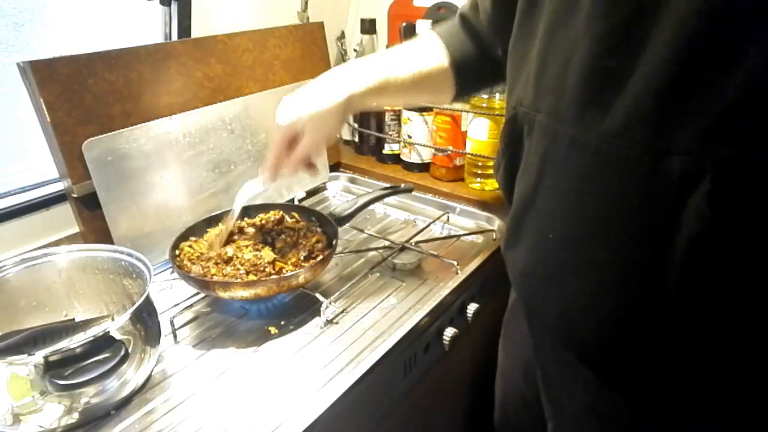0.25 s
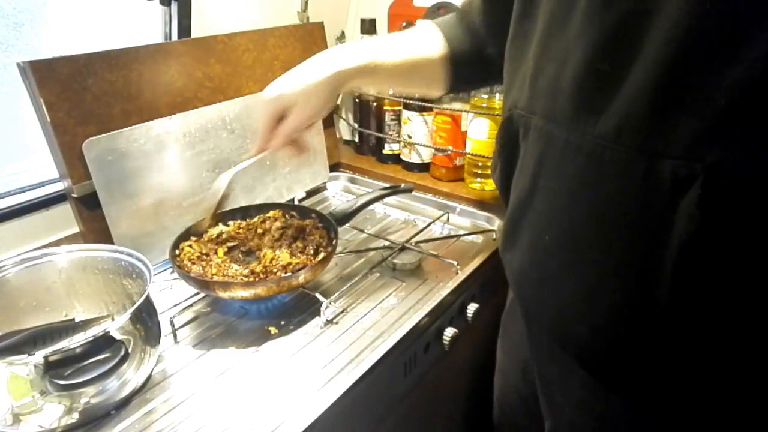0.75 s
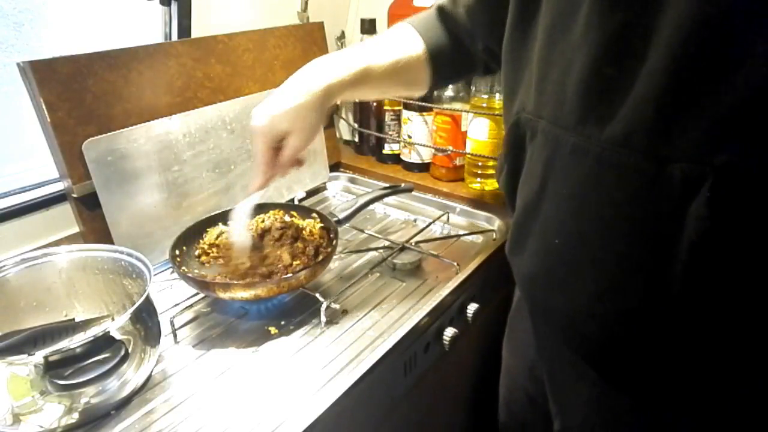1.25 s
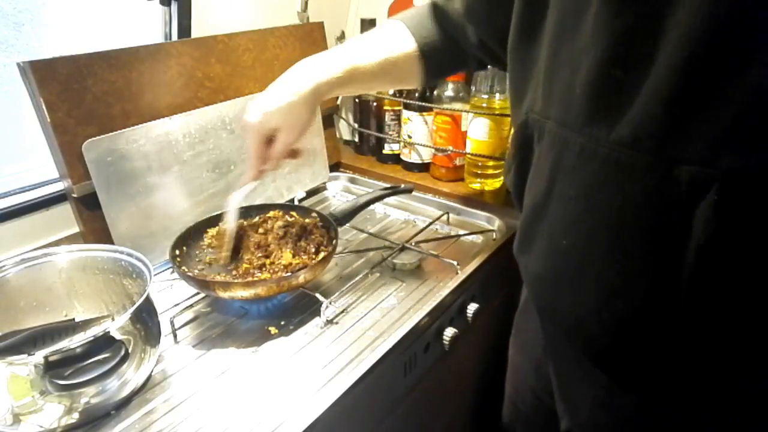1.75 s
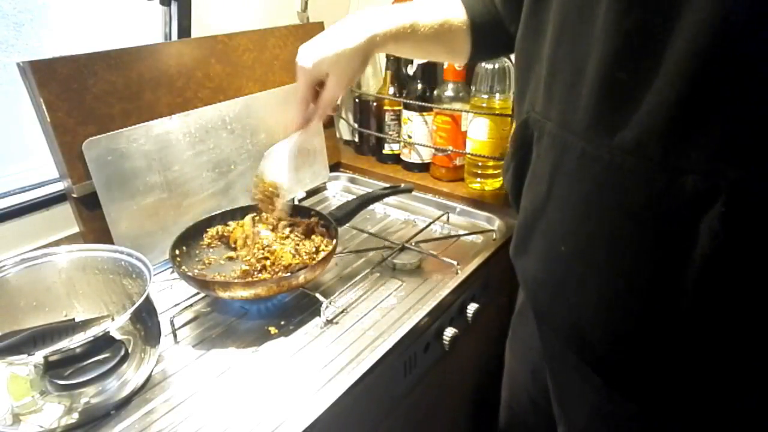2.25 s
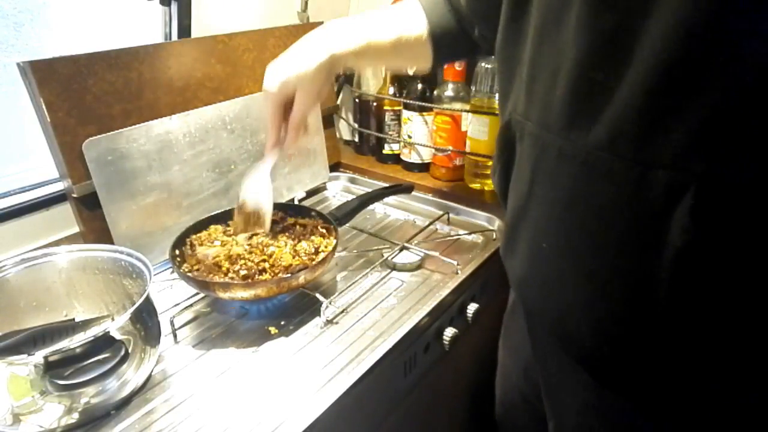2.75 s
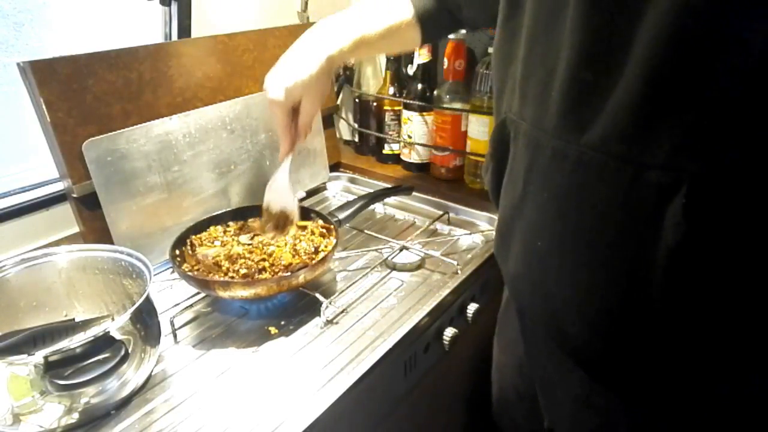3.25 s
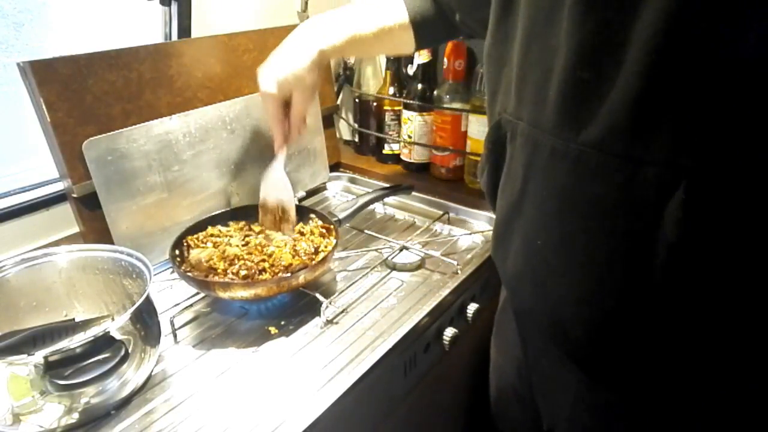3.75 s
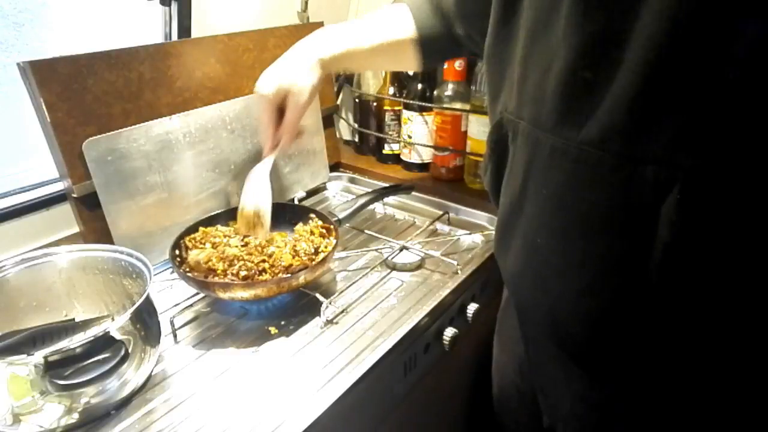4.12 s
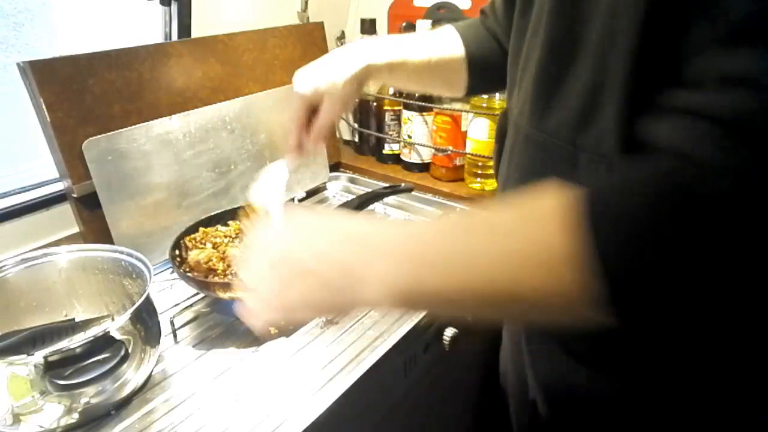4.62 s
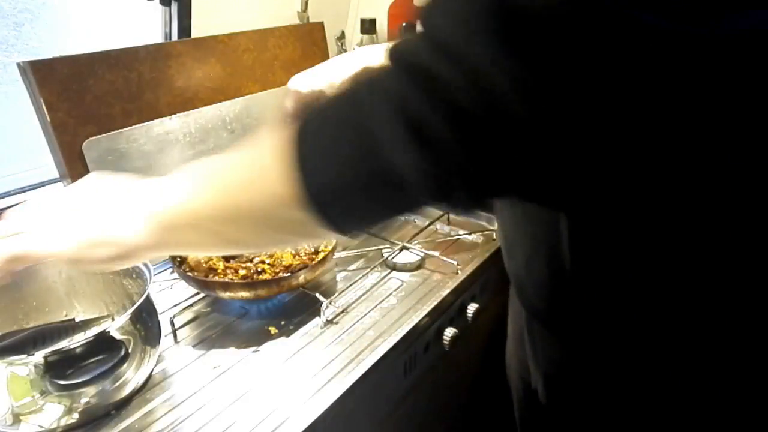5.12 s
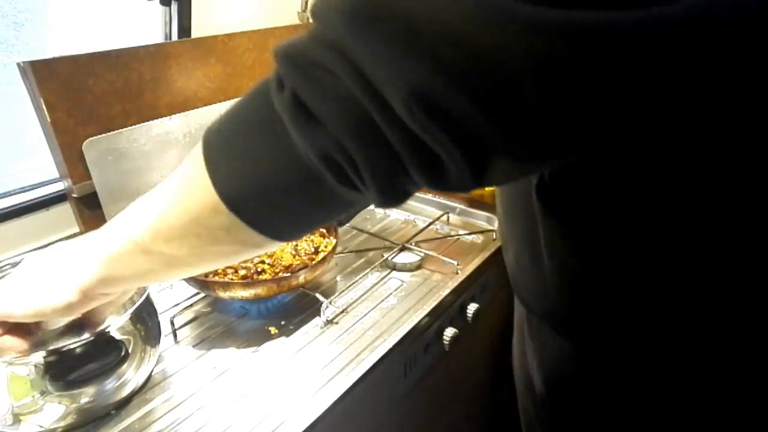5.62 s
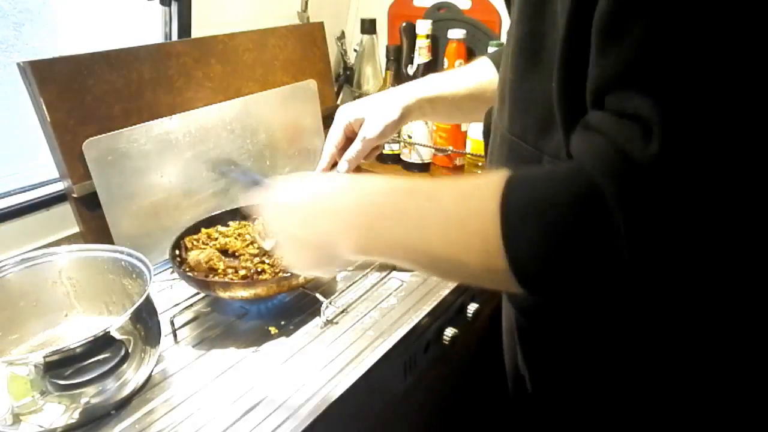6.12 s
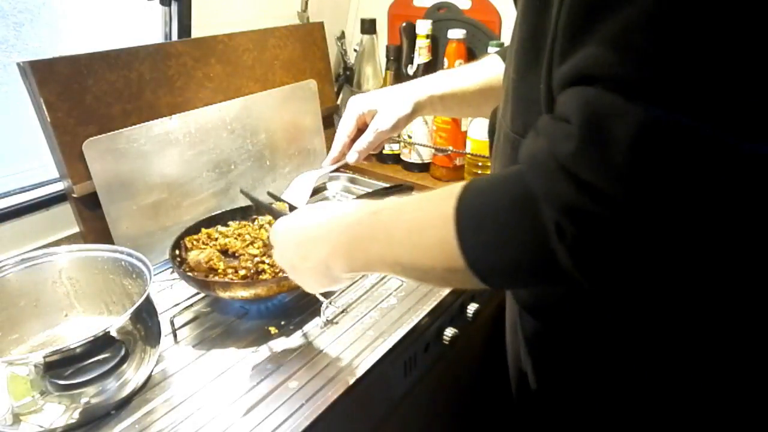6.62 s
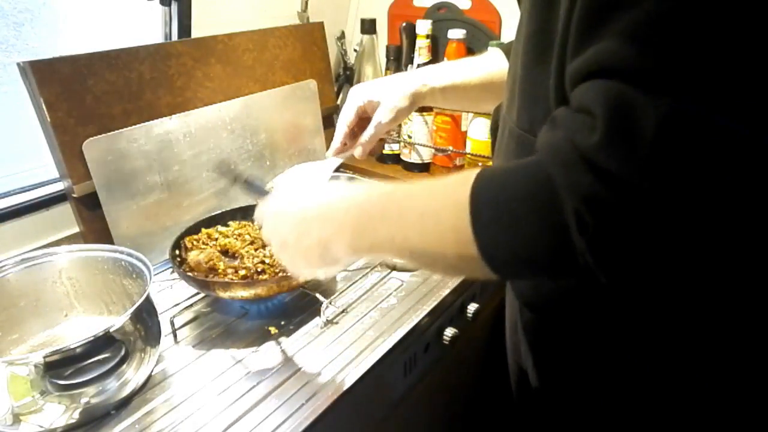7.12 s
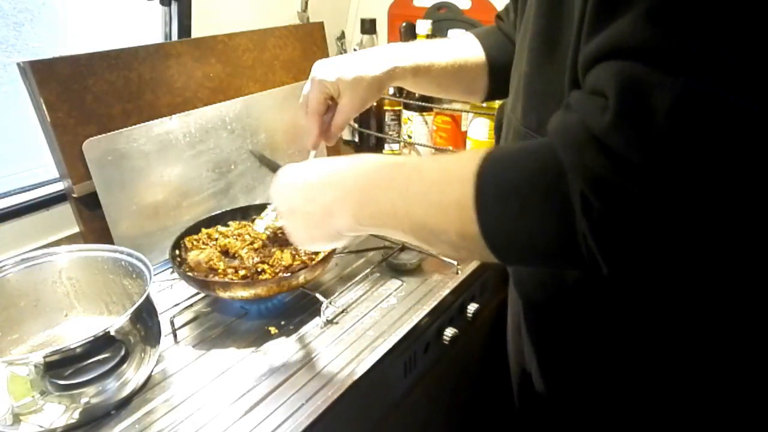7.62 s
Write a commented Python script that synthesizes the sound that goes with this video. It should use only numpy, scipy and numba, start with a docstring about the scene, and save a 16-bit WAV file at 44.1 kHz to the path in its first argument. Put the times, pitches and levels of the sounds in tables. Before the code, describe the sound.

A close, nearly dry kitchen perspective with a very faint low gas flutter beneath frying rice. At 0.3 s a short scrape and light knock make the quiet sizzle flare; thin steam follows. From 1.0 to 1.8 s the spatula works hard: gritty metallic scraping, a rapid cluster of dull wooden knocks with low hob thuds, a sharp oil pop at 1.2, and brighter hissing. A softer stroke comes at 2.1, then scraping and two knocks around 2.5-2.7. Between 3.2 and 4.1 s strokes crowd together, crackling and grating strongly at 3.4, with the loudest sharp knock near 3.97. Scrapes at 4.4 and 4.8 are lighter, the latter with a knock and sizzle flare. Steam whistles thinly at 5.3; steel pot clanks cluster at 5.55-5.7. Until about 8 s only low sizzle, faint scrapes, small taps and dry oil pops remain.

```python
"""A gas flame murmurs (filtered noise) under frying rice (noise bursts) in a pan in a small kitchen.
A wooden spatula stirs: rice crackles and flares into a sizzle, the blade chatters and grates (slips ring
metal modes) and knocks the pan and hob (struck modes). Steam hisses in narrow bands, oil spits as short
pops, and shoves judder the pan on its support. Later the other hand lifts a utensil out of a steel pot,
whose modes clank, and the stirring turns light."""
import sys
import numpy as np
from scipy import signal
from scipy.fft import rfft, irfft, next_fast_len
from scipy.io import wavfile
from scipy.ndimage import uniform_filter1d
from numba import njit

SR = 44100
rng = np.random.default_rng(int(sys.argv[2]) if len(sys.argv) > 2 else 0)


def waveform_to_disk(signal):
    """Save audio, clipped to [-1, 1], as 16-bit WAV at the path in sys.argv[1]."""
    frames = np.transpose(np.atleast_2d(signal))
    scaled = np.clip(frames, -1, 1) * 32767
    samples = np.round(scaled).astype(np.int16)
    wavfile.write(sys.argv[1], SR, samples)


N = 347067
TIME = np.arange(N) / SR
RING = np.arange(SR // 2) / SR  # half a second for each single sound

# Gas flame spectrum. Each row: frequency in Hz, relative gain in dB.
FLAME_SPECTRUM = [(15, -1), (28, -1), (45, -10), (76, -4), (110, -19), (165, -13.5), (250, -29.5),
                  (450, -36.5), (750, -23), (1100, -28), (3000, -51)]
FLAME_DB = -63

# Changing level of the frying, on which the strokes' flares ride. Each row: time in seconds,
# relative hiss level in dB, relative level of the fine treble spray in dB.
FRYING_LEVELS = [(0.0, -62.5, -68.5), (0.94, -58, -65.5), (1.25, -43, -49), (1.58, -48, -53.5),
                 (1.84, -41, -48.5), (2.17, -52, -54), (2.8, -45, -52), (3.37, -42.5, -48.5),
                 (3.57, -45.5, -56.5), (3.99, -44, -56), (4.14, -45, -57.5), (4.6, -50, -67.5),
                 (4.97, -58, -70.5), (5.52, -59.5, -67.5), (6.73, -57, -65), (7.87, -61, -71)]
# Hiss and spray spectra. Each row: frequency in Hz, relative gain in dB.
SIZZLE_SPECTRUM = [(1500, -46), (3000, -2.5), (4200, -5), (6300, 4), (8000, 5), (9500, -3), (11000, -22.5),
                   (14500, -20.5)]
SPRAY_SPECTRUM = [(6000, -30.5), (9000, 12), (10500, 9.5), (12000, 8), (14500, 1.5)]

# Spatula strokes. Each row: start in seconds, length in seconds, relative level of the blade on the pan
# in dB, relative level of the rice pushed aside in dB, relative flare of the sizzle in dB.
SPATULA_STROKES = [(0.265, 0.1, -45.5, -44, 9.5), (0.38, 0.041, -66, -46, 11.5),
                   (0.915, 0.084, -53, -47, 9.5), (1.04, 0.21, -44.5, -43, 6.5),
                   (1.276, 0.31, -48.5, -62, 1), (1.763, 0.24, -45.5, -51.5, -1),
                   (2.127, 0.18, -54, -75, 1.5), (2.515, 0.21, -43.5, -46.5, 7),
                   (2.788, 0.73, -46, -44.5, -1), (3.3, 0.096, -40.5, -50, -4),
                   (3.406, 0.07, -39, -44, 8.5), (3.55, 0.29, -48, -51.5, -4), (3.926, 0.14, -38, -40, 4),
                   (4.09, 0.25, -52, -53.5, -5.5), (4.384, 0.16, -45.5, -47.5, 0),
                   (4.84, 0.14, -44, -48.5, 13.5), (4.97, 0.24, -56.5, -56.5, 3.5),
                   (5.307, 0.14, -53, -54, 4.5), (5.736, 0.91, -70, -62.5, 0.5),
                   (6.733, 0.15, -58, -62, 0.5), (7.1, 0.096, -60, -59, 0.5), (7.318, 0.93, -84, -77, 3.5)]
BITE_S, SWELL_DB, LIFT_S = 0.045, 1.5, 0.05
RICE_SETTLE_S, FLARE_FADE_S = 0.063, 0.046
# relative floor between strokes, when the blade rests in the rice and barely moves
IDLE_BLADE_DB, IDLE_RICE_DB = -61.5, -60
# Rice and blade spectra. Each row: frequency in Hz, relative gain in dB.
CRACKLE_SPECTRUM = [(900, -43.5), (1800, -7.5), (2300, 1), (2900, 3), (3250, 1), (3650, 4), (4300, -3.5),
                    (6000, -3.5), (10000, -29)]
SCRAPE_SPECTRUM = [(100, -34.5), (380, 1.5), (560, -22.5), (760, -0.5), (980, 3), (1170, 15.5),
                   (1430, 10.5), (1600, 10.5), (1820, 15), (2200, -4), (3000, -8.5), (5000, -52),
                   (12000, -21)]

# Modes of the loaded pan. Each row: frequency in Hz, relative level in dB, 60 dB decay in seconds.
PAN_MODES = [(308.1, -4, 0.17), (401, -8.5, 0.15), (738, -2.5, 0.045), (773, -4, 0.032), (937, -9.5, 0.078),
             (984, -20, 0.053), (1169, -0.5, 0.093), (1293, -3, 0.063), (1429, 0.5, 0.092),
             (1545, -3, 0.094), (1648, -5, 0.065), (1768, -1, 0.074), (1960, -15, 0.037),
             (2156.4, -7.5, 0.16), (2970, -10, 0.056), (3460, -2, 0.11)]
# Modes of the hob under the pan. Each row: frequency in Hz, relative level in dB, 60 dB decay in seconds.
HOB_MODES = [(29.4, -10, 0.38), (63.3, 0, 0.22), (79.6, 8.5, 0.12), (115.7, -7, 0.11), (159.7, -2.5, 0.26),
             (303.4, -5.5, 0.34)]

# The edge grates on bare metal. Each row: start in seconds, length in seconds, relative level in dB,
# pitch at the start in Hz, pitch at the end in Hz.
METAL_RASPS = [(0.278, 0.072, -52, 800, 1400), (0.398, 0.048, -41.5, 1600, 1920),
               (1.047, 0.072, -40.5, 720, 670), (1.211, 0.063, -36.5, 1500, 1390),
               (3.323, 0.06, -34.5, 900, 830), (3.384, 0.075, -26.5, 1150, 1510),
               (3.892, 0.07, -32.5, 1670, 1390), (3.978, 0.073, -41, 894, 1000),
               (6.757, 0.22, -55, 1210, 1310), (7.124, 0.105, -50, 1700, 2400)]
RASP_BITE_S, RASP_SWELL_DB, RASP_LIFT_S, RASP_Q = 0.012, 6, 0.024, 1.64
# Grating blade spectrum. Each row: frequency in Hz, relative gain in dB.
RASP_SPECTRUM = [(200, -4), (500, -8.5), (750, -5.5), (2200, 1.5), (3000, -5.5), (6000, -7), (12000, -25)]

# Blade meets pan. Each row: start in seconds, relative knock peak in dB, relative peak of the hob's thud
# in dB, brightness of the contact in Hz.
PAN_KNOCKS = [(0.342, -42, -58, 2500), (1.038, -35, -34.5, 730), (1.244, -27, -27.5, 1500),
              (1.389, -32.5, -41, 1410), (1.409, -35.5, -30, 310), (1.481, -28, -26.5, 1130),
              (1.538, -32.5, -29, 1490), (1.573, -35, -29.5, 900), (1.677, -28.5, -55, 1280),
              (1.698, -29, -26.5, 845), (1.732, -37, -52, 710), (2.595, -30.5, -29.5, 1050),
              (2.675, -37, -32, 1010), (3.213, -34, -34.5, 1220), (3.237, -38, -28.5, 400),
              (3.324, -33, -35, 1420), (3.523, -31.5, -27, 890), (3.544, -27.5, -40, 2560),
              (3.864, -28, -33, 1860), (3.885, -27.5, -24.5, 2240), (3.971, -21.5, -26, 1820),
              (4.091, -27, -29.5, 1290), (4.827, -28.5, -62, 900), (5.058, -36, -38.5, 700),
              (5.133, -43.5, -41, 610), (6.453, -43, -64, 1510), (6.49, -58, -70, 1410),
              (7.116, -43, -76, 1780), (7.344, -51, -74, 2010), (7.81, -46, -55.5, 1510)]
# Dull wooden crack spectrum. Each row: frequency in Hz, relative gain in dB.
WOOD_SPECTRUM = [(60, -11.5), (200, 3.5), (500, -3.5), (800, -2.5), (1400, -2.5), (2200, -3), (4000, -4.5),
                 (12000, -12.5)]

# Jets of steam. Each row: start in seconds, length in seconds, relative level in dB, pitch in Hz.
STEAM_JETS = [(0.473, 0.058, -60, 6300), (0.558, 0.15, -63, 3560), (4.63, 0.085, -62, 5460),
              (5.34, 0.054, -52, 2800)]
JET_Q, JET_WAVER = 20, 0.027  # waver as a share of the pitch

# Spits of oil and ticks of rice. Each row: start in seconds, relative peak in dB, pitch in Hz.
OIL_SPITS = [(0.566, -40.5, 3700), (0.7964, -37, 6470), (1.214, -25, 8900), (1.9437, -36, 3030),
             (2.425, -30, 8200), (3.0504, -31, 3450), (3.543, -28, 2900), (4.9344, -33.5, 5940),
             (5.711, -42.5, 3000), (6.5526, -41, 7600), (6.7617, -37, 6450), (7.1136, -39, 2740),
             (7.307, -38, 6760), (7.6868, -36.5, 3400), (7.811, -40.5, 3630)]

# Shoves that drag the pan on its support. Each row: start in seconds, length in seconds,
# relative rumble level in dB.
PAN_SHOVES = [(1.01, 0.064, -46), (1.24, 0.55, -45.5), (2.5, 0.29, -50), (3.22, 0.06, -43),
              (3.36, 0.05, -45.5), (3.56, 0.12, -48), (3.86, 0.17, -39), (4.08, 0.15, -44),
              (4.77, 0.19, -58.5), (5.06, 0.062, -49.5), (5.41, 0.2, -48), (6.03, 0.17, -67),
              (7.49, 0.7, -62.5)]
SHOVE_GRIP_S, SHOVE_SWELL_DB, SHOVE_FADE_S = 0.014, -0.46, 0.1

# Utensil against the steel pot. Each row: start in seconds, peak in dB, brightness of the contact in Hz,
# decay constant of the skid in seconds.
POT_CLANKS = [(5.5504, -33.5, 1170, 0.0086), (5.565, -35.5, 1400, 0.012), (5.636, -36.5, 770, 0.018),
              (5.7106, -34, 1490, 0.0014)]
# Modes of the pot. Each row: frequency in Hz, relative level in dB, 60 dB decay in seconds.
POT_MODES = [(65, 0, 0.22), (183, -16, 0.25), (382.7, -4, 0.36), (710, -5.5, 0.12), (1142, -4, 0.15),
             (1233, -10, 0.15), (1320, -13, 0.5), (1390, 3.5, 0.044), (1534, -6, 0.083), (1975, -17, 0.11),
             (2100, -14, 0.09), (2980, -17, 0.12)]
POT_DETUNE = 0.012  # typical share by which a touch shifts each mode

# Filter on the side signal. Each row: frequency in Hz, gain in dB.
SIDE_SPECTRUM = [(3500, -71), (4300, -73), (5200, -23), (7000, -6), (14000, -3.5)]
TOP_HZ = 14400


def undb(db):
    """Decibels to gain."""
    return 10 ** (np.asarray(db) / 20)


def unit(x):
    """Scale to rms 1."""
    return x / np.sqrt(np.mean(x ** 2))


def peak(x, db):
    """Scale to a peak level."""
    return x * undb(db) / np.max(np.abs(x))


def curves(table):
    """Each column of a table as a value per sample."""
    s, *columns = np.transpose(table)
    return [np.interp(TIME, s, column) for column in columns]


def add(track, s, x):
    """Mix a sound in at a time."""
    i = int(s * SR)
    track[i:i + len(x)] += x[:N - i]


def fade(t60):
    """Exponential decay by 60 dB in t60 seconds."""
    return np.exp(-np.log(1000) * RING / t60)


def colour(x, points, size=4096):
    """Minimum-phase filter through (Hz, dB) points."""
    hz, db = np.transpose(points)
    bins = np.maximum(np.arange(size // 2 + 1) * SR / size, 1)
    gain_db = np.interp(np.log(bins), np.log(hz), db)
    cepstrum = irfft(np.log(undb(gain_db)))
    # folding the cepstrum forward makes the filter causal
    cepstrum[1:size // 2] *= 2
    cepstrum[size // 2 + 1:] = 0
    response = irfft(np.exp(rfft(cepstrum)))
    return signal.fftconvolve(x, response)[:len(x)]


def walk(rate):
    """Slow random drift around 0, through `rate` normally spread knots per second."""
    knots = rng.standard_normal(4000)
    return np.interp(TIME * rate, np.arange(len(knots)), knots)


def clicks(rate, spread_db):
    """Random clicks per second of either sign; positive spread makes a few larger, negative a few smaller."""
    size = undb(spread_db * np.minimum(rng.exponential(size=N), 5))
    return (rng.random(N) < rate / SR) * size * rng.choice([-1, 1], N)


def bursts(rate, spread_db, t60):
    """Random bursts of noise per second, each with a short decaying tail."""
    decay = undb(-120 / (t60 * SR))  # for power, so twice the dB
    power = signal.lfilter([1], [1, -decay], clicks(rate, spread_db) ** 2)
    return np.sqrt(power) * rng.standard_normal(N)


def ring(modes, scatter_db):
    """Decaying modes of alternating sign; each point of contact weights them anew."""
    chance = rng.standard_normal(len(modes))
    out = np.zeros(len(RING))
    for k, (hz, db, t60) in enumerate(modes):
        level = (-1) ** k * undb(db + scatter_db * chance[k])
        out += level * fade(t60) * np.sin(2 * np.pi * hz * RING)
    return out


def contact(x, hz):
    """A soft contact wakes the low modes, a hard one the high modes; each spot favours a pitch of its own."""
    return colour(x, [(hz / 10, -7), (hz / 3, -3), (hz / 1.4, -2.5), (hz, 4),
                      (hz * 1.02, -3.5), (hz * 2, -6), (hz * 6, -17)])


def shake(x, push_s):
    """The pan's weight passes a force on to the hob as a slow push, which spares the high modes."""
    return signal.fftconvolve(x, RING * np.exp(-RING / push_s))[:len(x)]


def shifting(x, depth_db, rate):
    """Narrow bands swell and fade on their own, as the sounding spots move about the pan; rms 1."""
    size = next_fast_len(N)
    spectrum = rfft(x, size)
    hz = np.maximum(np.arange(len(spectrum)) * SR / size, 1)
    place = np.clip(6 * np.log2(hz / 1200), 0, 22)  # six overlapping bands per octave
    out = np.zeros(N)
    for k in range(23):
        band = irfft(spectrum * np.maximum(1 - abs(place - k), 0), size)[:N]
        out += band * undb(depth_db * walk(rate))
    return unit(out)


def gesture(start, length, attack_s, swell_db, release_s):
    """One push of the hand: linear attack, drift from -2 to -1 times swell_db, exponential release."""
    age = TIME - start
    attack = np.clip(age / attack_s, 0, 1)
    held = np.clip(age / length, 0, 1)
    release = np.exp(-np.maximum(age - length, 0) / release_s)
    return attack * undb(swell_db * (held - 2.0)) * release


def effort(pushes, attack_s, swell_db, release_s):
    """Joint gain of (start s, length s, dB) pushes; their powers add."""
    power = np.zeros(N)
    for s, length, db in pushes:
        power += (undb(db) * gesture(s, length, attack_s, swell_db, release_s)) ** 2
    return np.sqrt(power)


@njit
def resonate(x, hz, q):
    """Band-pass whose centre may move every sample."""
    y, band, low = np.empty(len(x)), 0., 0.
    for i in range(len(x)):
        g = np.tan(np.pi * min(hz[i] / SR, .45))
        v = (band + g * (x[i] + 1e-18 - low)) / (1 + g * (g + 1 / q))
        band, low, y[i] = 2 * v - band, low + 2 * g * v, v / q
    return y


def flame():
    """The gas flame flutters softly: mostly low noise with a slowly drifting level."""
    return unit(colour(rng.standard_normal(N), FLAME_SPECTRUM)) * undb(FLAME_DB + 2 * walk(3.4))


def frying():
    """Steam bubbles burst in the oil: a hiss and a fine spray, flaring as strokes turn wet rice onto hot metal."""
    hiss_db, spray_db = curves(FRYING_LEVELS)
    flare_db = np.zeros(N)
    for s, length, _, _, db in SPATULA_STROKES:
        flare_db += db * gesture(s, length, BITE_S, SWELL_DB, FLARE_FADE_S)
    bubbles = bursts(rate=2200, spread_db=4.2, t60=0.055)
    droplets = bursts(rate=3200, spread_db=2.5, t60=0.052)
    hiss = undb(hiss_db - 2.0) * unit(colour(bubbles, SIZZLE_SPECTRUM))
    spray = undb(spray_db + 1.5) * unit(colour(droplets, SPRAY_SPECTRUM))
    hiss = np.std(hiss) * shifting(hiss, depth_db=2.3, rate=11)
    return (hiss + spray) * undb(flare_db + walk(40))


def rice():
    """Wet grains part and crackle ahead of the blade, then settle."""
    pushes = [(s, length, db) for s, length, _, db, _ in SPATULA_STROKES]
    push = effort(pushes, BITE_S, SWELL_DB, RICE_SETTLE_S)
    crackle = colour(bursts(rate=1200, spread_db=2.5, t60=0.04), CRACKLE_SPECTRUM)
    level = np.hypot(push, undb(IDLE_RICE_DB)) * undb(-1.0 + walk(40))
    return shifting(crackle, depth_db=2.5, rate=9) * level


def scraping():
    """The blade sticks and slips over the pan; the harder it bears down, the more the metal rings."""
    # a stroke bites, bears down harder as rice piles up before the blade, and lets go
    pushes = [(s, length, db) for s, length, db, _, _ in SPATULA_STROKES]
    push = effort(pushes, BITE_S, SWELL_DB, LIFT_S)
    level_db = 20 * np.log10(np.hypot(push, undb(IDLE_BLADE_DB)))
    pressure = np.clip((level_db + 67.0) / 65, .05, .7)
    chatter = undb(1.85 * walk(70))
    grit = colour(bursts(rate=900, spread_db=-2.0, t60=0.022) * chatter, SCRAPE_SPECTRUM)
    grit = shifting(grit, depth_db=3.0, rate=22)
    slips = clicks(rate=1600, spread_db=1.0) * chatter
    # as the blade travels it crosses the nodes of each mode, so they swell and fade in turn
    metal = np.zeros(N)
    for k, mode in enumerate(PAN_MODES[2:]):
        tone = signal.oaconvolve(slips, ring([mode], scatter_db=3.5))[:N]
        metal += (-1) ** k * tone * undb(2 * walk(7))
    # a filter thins the ringing metal below about 500 Hz
    metal = unit(colour(metal, [(200, -24), (500, 2), (720, 0.5)]))
    return undb(level_db - 0.5) * (np.sqrt(1 - pressure) * grit + np.sqrt(pressure) * metal)


def rasping():
    """The edge grates on bare metal: rapid slips ring pan and blade, whose pitch slides as its angle changes."""
    slips = bursts(rate=420, spread_db=-0.5, t60=0.015)
    metal = signal.oaconvolve(slips, ring(PAN_MODES[2:], scatter_db=0))[:N]
    grate = unit(metal) + undb(1.0) * unit(colour(slips, RASP_SPECTRUM))
    out = np.zeros(N)
    for s, length, db, from_hz, to_hz in METAL_RASPS:
        hz = np.interp(TIME, [s, s + length], [from_hz, to_hz])
        push = gesture(s, length, RASP_BITE_S, RASP_SWELL_DB, RASP_LIFT_S)
        out += undb(db) * unit(resonate(grate, hz, RASP_Q)) * push
    return out


def knocks():
    """Wood strikes the pan and chatters: a dull crack, the damped ring of the metal and a thud from the hob."""
    out = np.zeros(N)
    for s, knock_db, thud_db, hz in PAN_KNOCKS:
        crack = rng.standard_normal(len(RING)) * (fade(0.067) + undb(1.8) * fade(0.36))
        crack = colour(crack, WOOD_SPECTRUM)
        strike = rng.standard_normal(len(RING)) * fade(0.022)
        metal = signal.fftconvolve(strike, ring(PAN_MODES, scatter_db=-0.5))[:len(RING)]
        blow = contact(unit(crack) + undb(-5.0) * unit(metal), hz)
        thud = shake(ring(HOB_MODES, scatter_db=2.5), push_s=0.00091)
        add(out, s, peak(blow, knock_db - 0.17) + peak(thud, thud_db - 2.0))
    return out


def steam():
    """Steam squeezes out from under the rice in narrow, wavering hisses."""
    out = np.zeros(N)
    for s, length, db, hz in STEAM_JETS:
        jet = resonate(rng.standard_normal(N), hz * (1 + JET_WAVER * walk(23)), JET_Q)
        out += undb(db) * unit(jet) * gesture(s, length, attack_s=0.055, swell_db=-2.5, release_s=0.035)
    return out


def spits():
    """Single sharp pops, each a brief burst around its own pitch; the higher, the shorter."""
    out = np.zeros(N)
    for s, db, hz in OIL_SPITS:
        burst = rng.standard_normal(len(RING)) * fade(140 / hz)
        pop = colour(burst, [(hz / 6, -22), (hz / 2, -7), (hz, 0), (hz * 4, -28)])
        add(out, s, peak(pop, db + 1.5))
    return out


def dragging():
    """The pan judders on its support and sways the hob's lower modes."""
    push = effort(PAN_SHOVES, SHOVE_GRIP_S, SHOVE_SWELL_DB, SHOVE_FADE_S)
    slips = clicks(rate=220, spread_db=1.0)
    judder = signal.fftconvolve(slips, ring(HOB_MODES[:4], scatter_db=2.5))[:N]
    # friction limits the swing, so the shaking follows the push
    steady = judder / np.sqrt(uniform_filter1d(judder ** 2, size=4000) + 1e-9)
    return steady * push * undb(2.5 + 2 * walk(33))


def clanks():
    """A utensil bumps and skids on the steel pot; every touch finds another spot and shifts the modes."""
    out = np.zeros(N)
    for s, db, hz, skid_s in POT_CLANKS:
        skid = rng.standard_normal(len(RING)) * np.exp(-RING / skid_s)
        detune = 1 + POT_DETUNE * rng.standard_normal(len(POT_MODES))
        modes = [(f * d, gain_db, t60) for (f, gain_db, t60), d in zip(POT_MODES, detune)]
        steel = signal.fftconvolve(skid, ring(modes, scatter_db=2.0))[:len(RING)]
        rattle = colour(rng.standard_normal(len(RING)) * fade(0.2), WOOD_SPECTRUM)
        add(out, s, peak(contact(unit(steel) + undb(-4) * unit(rattle), hz), db))
    return out


def kitchen(x, t60, wet_db):
    """Close walls scatter a very short tail, thin in the lows."""
    tail = rng.standard_normal(len(RING)) * fade(t60) * (RING > .002)
    tail = tail / np.sqrt(np.sum(tail ** 2))
    tail = colour(tail, [(120, -13), (600, 1.0), (3500, 3.5), (7000, -1.5), (14000, 2.0)])
    return undb(wet_db) * signal.fftconvolve(x, tail)[:N]


def scene():
    """All sources sit straight ahead; only the treble of frying, rice and spits spreads to the sides."""
    struck = scraping() + rasping() + dragging() + knocks() + spits() + clanks()
    direct = frying() + rice() + steam() + struck
    mid = direct + kitchen(direct, t60=0.016, wet_db=-10.5) + flame()
    # bubbles burst all over the pan, so the side hears its own share of them
    side = colour(frying() + rice() + undb(-11) * spits(), SIDE_SPECTRUM)
    return np.array([mid + side, mid - side])


def record(dry):
    """A steep low-pass cuts the top."""
    low_pass = signal.ellip(12, .1, 80, TOP_HZ, fs=SR, output="sos")
    return signal.sosfilt(low_pass, dry)


dry = scene()
out = record(dry)
waveform_to_disk(out)
```